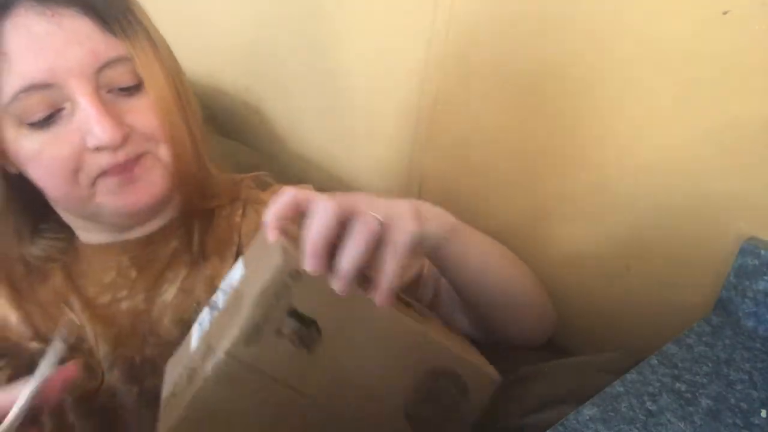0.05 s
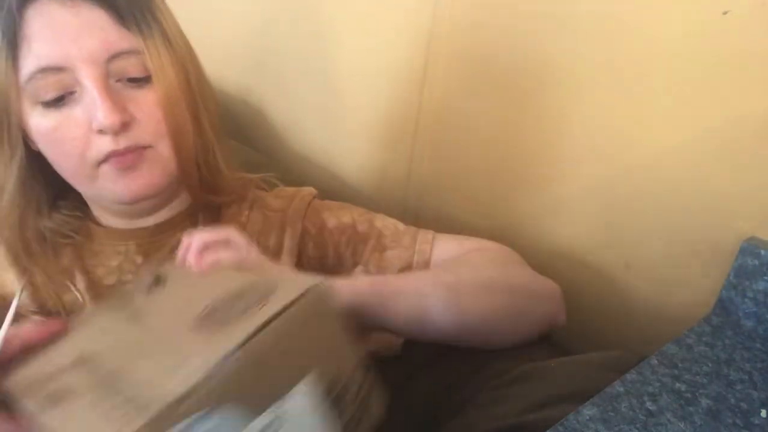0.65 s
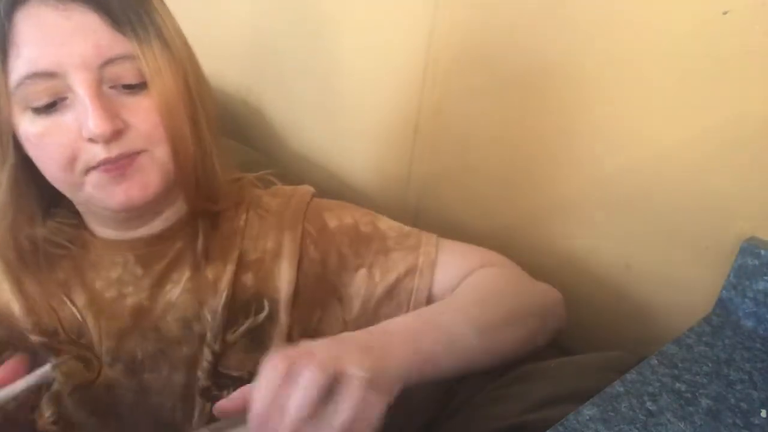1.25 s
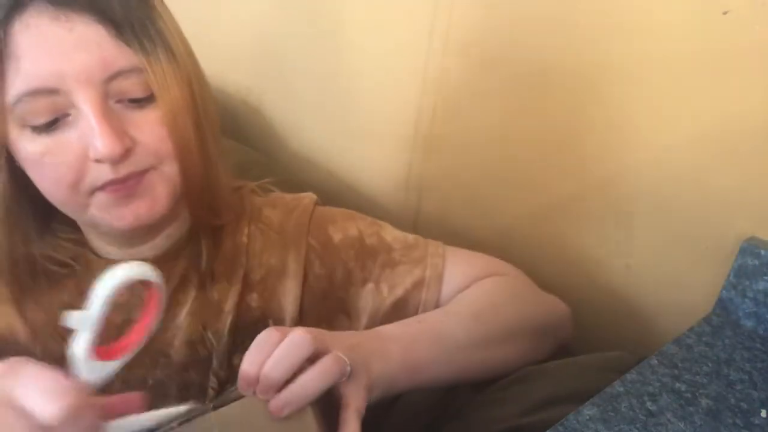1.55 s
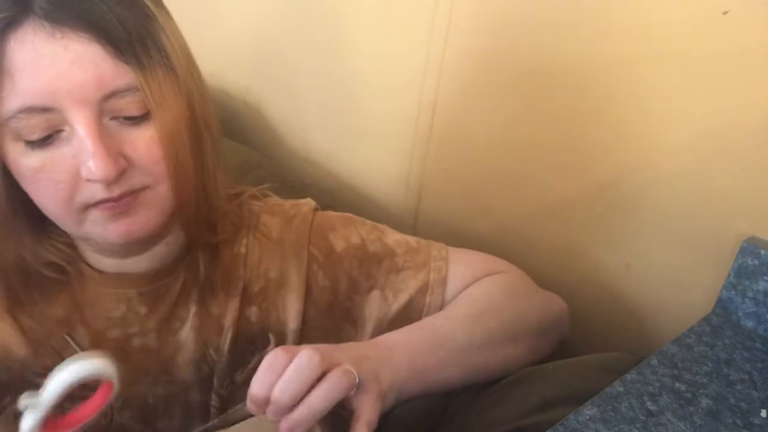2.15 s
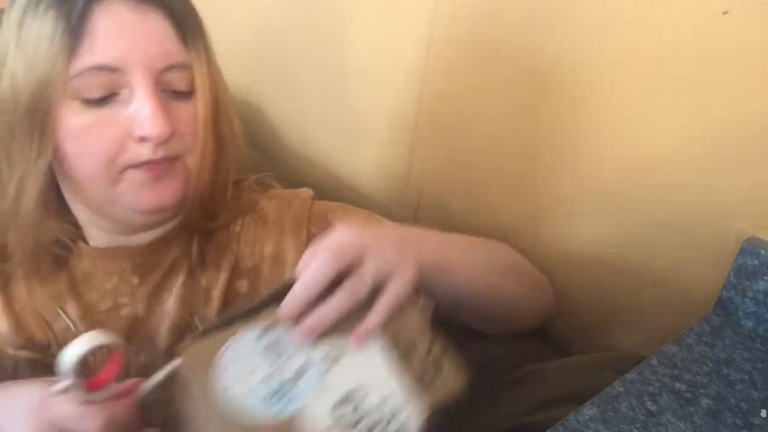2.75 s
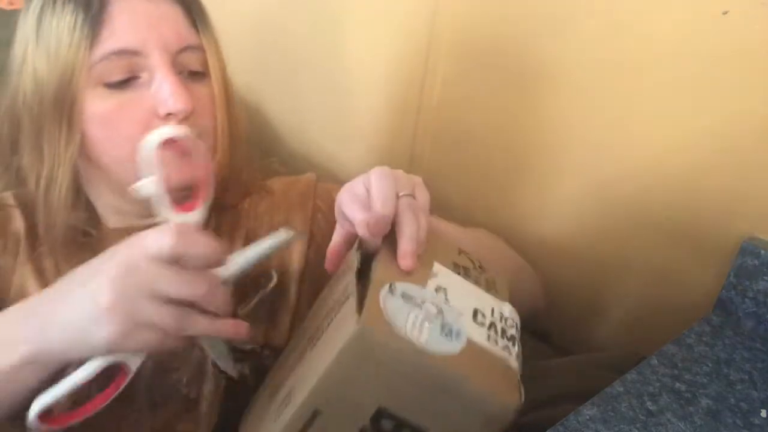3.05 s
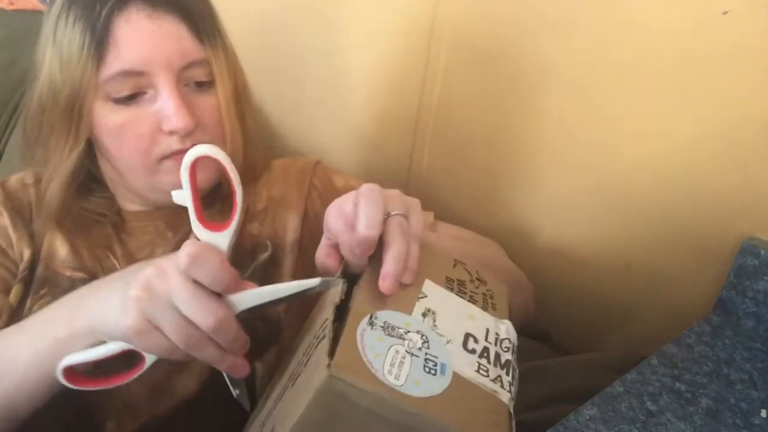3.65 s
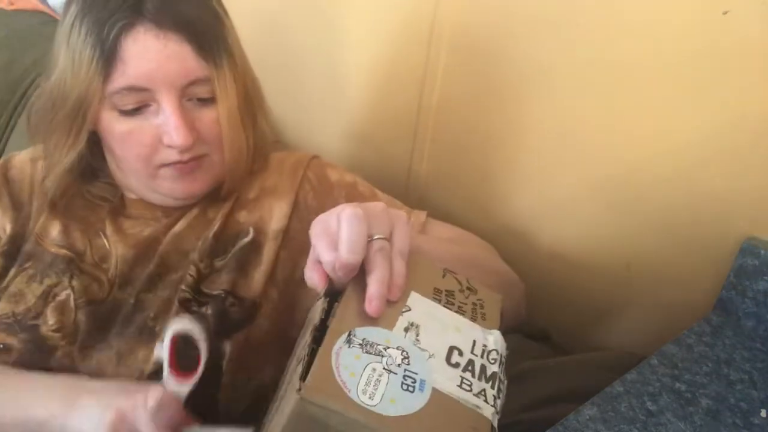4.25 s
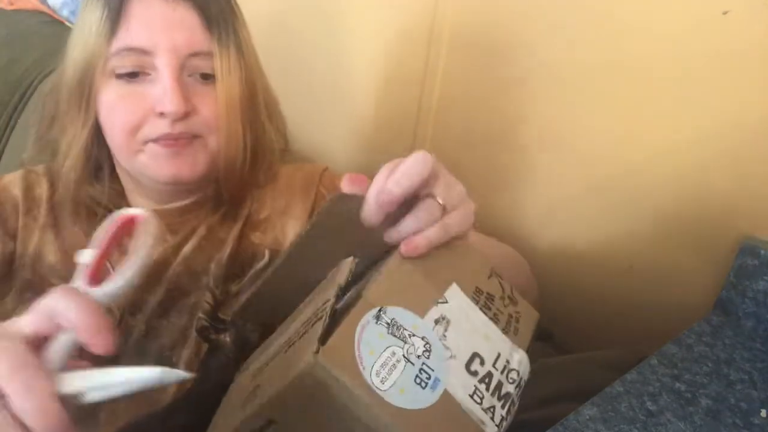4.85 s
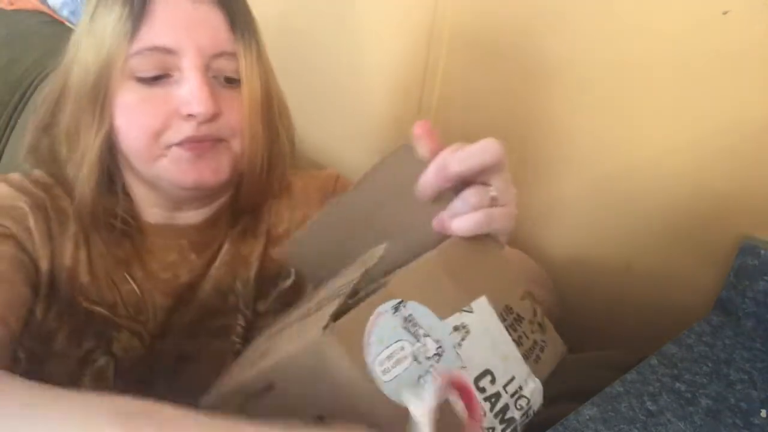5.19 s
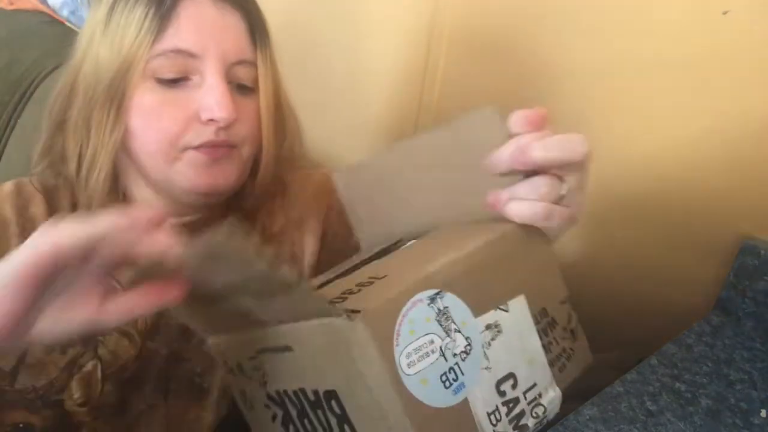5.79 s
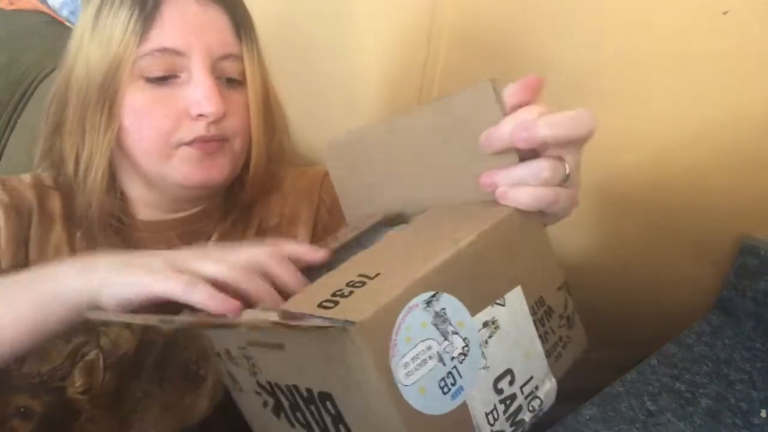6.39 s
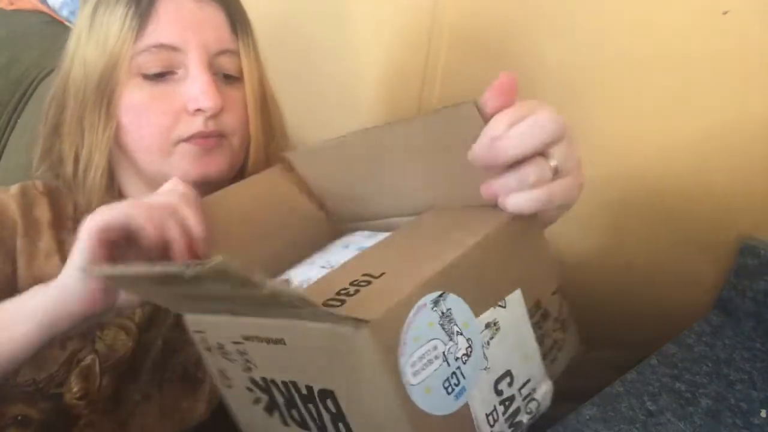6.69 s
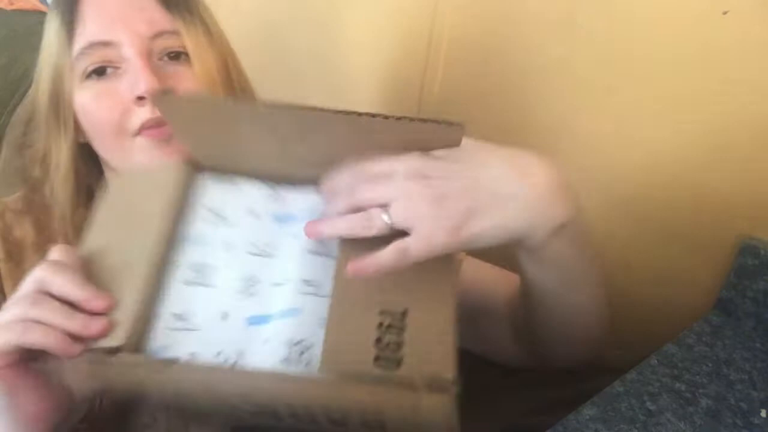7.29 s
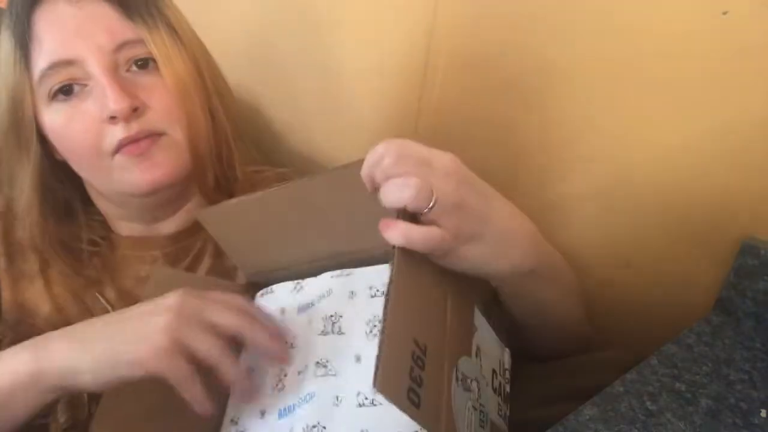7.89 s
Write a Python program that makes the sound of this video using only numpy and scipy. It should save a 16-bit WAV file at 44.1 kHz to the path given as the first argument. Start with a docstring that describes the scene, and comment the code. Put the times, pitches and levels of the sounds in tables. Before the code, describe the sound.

Close handling of a cardboard parcel: hands rub, a blade rasps along tape, the tape snaps and the flaps knock open.

```python
"""A cardboard parcel opened on a lap in a small furnished room, close to the microphone.
First hands slide over the board and turn the parcel, while a low motor-like drone gathers far off.
A scissor blade sticks and slips along the packing tape, busiest around 4 s; the tape snaps, and
each contact rings the hollow box. At 5.3 s the flaps part and its lowest resonances fade.
Hands work on over the open box, with a hard knock near 7 s, as the drone sinks."""
import sys
import numpy as np
from scipy import signal
from scipy.fft import rfft, irfft
from scipy.io import wavfile

SR = 44100
rng = np.random.default_rng(int(sys.argv[2]) if len(sys.argv) > 2 else 0)


def to_wav(s):
    """Save 16-bit WAV."""
    ch = np.atleast_2d(s).T  # columns
    pcm = np.round(np.clip(ch, -1, 1) * 32767)  # PCM
    wavfile.write(sys.argv[1], SR, pcm.astype(np.int16))


N = 349799


def scrapes(rise_s=.003, fall_s=.0031, chatter_db=.5, stiffness_db=-2, flex_below_hz=560, pivot_hz=1400):
    """Each slip of blade, tape or board is a short avalanche of fractures; a hard push flexes the wall."""
    # Each row: start in seconds, length in seconds, level in dB, wall flex in dB,
    # treble slope in dB per octave.
    slips = [(0.387, 0.026, -36.5, 1, -5), (0.478, 0.012, -34.5, -7, -13.5), (0.511, 0.014, -34, -1.5, -11),
             (0.568, 0.017, -32, -24, -13), (0.892, 0.01, -30, 1, -3.5), (0.966, 0.045, -40, 15.5, -2.5),
             (1.03, 0.029, -35.5, 15, -9), (1.096, 0.0071, -34, -8, -7.5), (1.159, 0.014, -44, -8, -1),
             (1.732, 0.015, -42.5, 10, -5), (1.849, 0.013, -39.5, 11, -3.5),
             (1.922, 0.016, -23.5, 13.5, -0.5), (1.946, 0.0096, -25, 7.5, -3.5),
             (2.172, 0.021, -28.5, 18, -0.5), (2.198, 0.014, -24.5, 7, -13), (2.217, 0.0076, -23, 20, 0.5),
             (2.234, 0.04, -33.5, 9, -2), (2.45, 0.0069, -30.5, 16, -4), (3.432, 0.012, -46.5, 7, -10),
             (3.462, 0.013, -46, -3, -6), (3.569, 0.013, -46, 1, -9), (3.888, 0.063, -34.5, 16.5, -1.5),
             (3.94, 0.0087, -19.5, 8, -5.5), (3.956, 0.025, -27.5, 15, -3.5),
             (3.99, 0.0082, -24, 2.5, -7.5), (4.063, 0.011, -26, 9.5, -6), (4.087, 0.013, -23.5, 1, -7.5),
             (4.108, 0.029, -25.5, 6, -6), (4.148, 0.012, -25, 7, -7.5), (4.173, 0.012, -23, 9, -8),
             (4.197, 0.01, -21, 6, -7.5), (4.221, 0.0097, -23, 9, -7), (4.244, 0.012, -18, 6, -9),
             (4.254, 0.011, -16, -3, -10), (4.264, 0.014, -28, 5, -8), (4.295, 0.041, -25, 10.5, -8),
             (4.341, 0.043, -26, 6, -7), (4.386, 0.009, -19.5, 7, -9.5), (4.524, 0.021, -33.5, 7, -4.5),
             (4.598, 0.029, -41, 8, -2.3), (5.307, 0.027, -30.5, -1, 0.5), (5.329, 0.011, -18.5, 1, -3),
             (5.343, 0.012, -27, 18, -3), (5.369, 0.033, -30.5, 12, -2.5), (5.411, 0.012, -26, 1, -5),
             (5.448, 0.0066, -29, 9, -8.5), (5.496, 0.011, -34, 8, -8.5), (6.093, 0.0093, -35, 7.5, -6.5),
             (6.344, 0.011, -33.5, 18, -2), (6.393, 0.026, -35.5, 5.5, -4.5),
             (6.459, 0.044, -39.5, 6.5, -6.5), (6.553, 0.016, -32, -6, -1.5), (7.062, 0.01, -29, 2, -8),
             (7.319, 0.027, -37.5, 0, -13), (7.359, 0.0055, -36, -15, -3), (7.92, 0.0082, -27, -1.5, -6.5)]
    # Spectrum of the contact. Each row: frequency in Hz, gain in dB.
    contact_colour = [(35, -41), (80, -8.5), (150, -0.5), (230, -1.5), (500, -1.5), (1400, -0.5),
                      (2500, -3), (4000, 3), (4900, -3.5), (7000, 0), (10400, -1), (13000, 1.5),
                      (16000, -8)]
    out = np.zeros(N)
    for start, length, db, flex_db, slope_db in slips:
        t = np.arange(int((length + .04) * SR)) / SR
        grip = np.minimum(t / rise_s, 1) * np.exp(-np.maximum(t - length, 0) / fall_s)
        force = grip * fibres(len(t), rate=7000, spread_db=1.5) * amp(chatter_db * walk(326, len(t)))
        flex = (flex_db + stiffness_db) / (1 + (bins() / flex_below_hz) ** 4)
        treble = slope_db * np.log2(np.maximum(bins() / pivot_hz, 1))
        colour = spectrum(contact_colour) + flex + treble + contact_spot(ripple_db=3)
        burst = signal.fftconvolve(force, response(colour))
        add(out, start - rise_s / 2, burst / np.linalg.norm(burst) * np.sqrt(length * SR) * amp(db))
    return out


def snaps(level_db=21, splinter=.21, splinter_s=.0028, skirt_db=19):
    """Tape or a crease cracks, or the blade ticks: one sharp release, then milliseconds of splintering."""
    # Each row: start in seconds, relative level in dB, centre in Hz, width in octaves.
    fractures = [(0.54, -26.5, 1720, 0.17), (0.555, -28.5, 1970, 0.17), (0.5808, -33, 1630, 0.18),
                 (0.9024, -21.5, 1440, 0.16), (0.965, -36, 1500, 0.2), (1.1333, -32, 1550, 0.24),
                 (1.7004, -41.5, 1650, 2), (1.731, -39, 1610, 2.2), (1.9219, -14.5, 3320, 0.79),
                 (2.2046, -20.5, 3000, 2), (2.3978, -31.5, 5500, 1.5), (2.7654, -34.5, 1964, 0.7),
                 (2.863, -37, 1800, 0.19), (2.902, -33.5, 1780, 0.17), (2.9163, -28, 1770, 0.14),
                 (3.063, -35, 1990, 0.58), (3.0935, -35.5, 2120, 0.7), (3.1168, -32, 1780, 0.37),
                 (3.177, -40, 2840, 0.85), (3.3224, -44, 1155, 1.1), (3.7012, -33, 5040, 1.5),
                 (3.8194, -28.5, 2400, 4.3), (4.1169, -15, 2040, 2), (4.412, -31.5, 3940, 0.28),
                 (4.6048, -30.5, 3250, 0.74), (5.3644, -11, 3100, 0.56), (5.3922, -15.5, 11000, 0.94),
                 (5.4182, -20.5, 2110, 0.29), (5.472, -32.5, 2410, 2.7), (5.532, -34.5, 8500, 0.97),
                 (5.9663, -41.5, 2570, 0.79), (6.0084, -37, 3460, 0.94), (6.205, -38.5, 2830, 0.56),
                 (6.7578, -34.5, 1220, 0.41), (6.7862, -31, 4130, 1.6), (6.839, -27.5, 3230, 0.44),
                 (7.045, -30.5, 3000, 0.61), (7.321, -32.5, 3000, 0.37), (7.336, -35, 3480, 0.43),
                 (7.361, -33, 2200, 0.22), (7.459, -28, 3260, 0.33)]
    out = np.zeros(N)
    t = np.arange(1024) / SR
    for start, db, hz, octaves in fractures:
        force = splinter * rng.standard_normal(len(t)) * np.exp(-t / splinter_s)
        force[0] += 1  # the release
        off_centre = np.log2(bins() / hz) / max(octaves, .2)
        colour = -skirt_db * np.log10(1 + off_centre ** 2 / 2) + contact_spot(ripple_db=3)
        crack = signal.fftconvolve(force, response(colour))
        add(out, start + .0003, crack / np.linalg.norm(crack) * amp(db + level_db))
    return out


def knocks(travel=.0602, rebound=.22, tilt=.55):
    """A blow sends bending waves across the wall, highs ahead of lows; they return once from the edge."""
    # Each row: start in seconds, peak in dB, lower and upper band edge in Hz.
    blows = [(0.915, -22.5, 260, 1000), (0.985, -28.5, 160, 750), (1.059, -32, 147, 483),
             (1.228, -30.5, 169, 520), (1.701, -23, 185, 730), (1.923, -17, 190, 1350),
             (1.932, -19, 160, 780), (2.18, -20.5, 170, 800), (2.221, -18, 145, 1000),
             (2.458, -31, 280, 1000), (3.321, -36, 160, 1100), (3.944, -16, 125, 1300),
             (4.389, -10.5, 190, 1500), (5.317, -15.5, 260, 1300), (5.333, -7, 202, 1530),
             (5.375, -21, 220, 500), (5.822, -24, 205, 1150), (6.348, -24, 218, 1500),
             (6.46, -23.5, 220, 1300), (7.0444, -2, 297, 1370), (7.388, -25.5, 250, 1150),
             (7.921, -19.5, 120, 330)]
    out = np.zeros(N)
    hz = bins(size=8192)
    crossing = np.exp(-4j * np.pi * travel * np.sqrt(hz))  # delay falls with the root of frequency
    for start, db, low_hz, high_hz in blows:
        push = hz ** -tilt / np.sqrt((1 + (low_hz / hz) ** 10) * (1 + (hz / high_hz) ** 10))
        wave = irfft(push * (crossing + rebound * crossing ** 3))
        add(out, start - .001, wave / np.abs(wave).max() * amp(db))
    return out


def drags(level_db=-1, stutter_db=2.5, relative_width=.2):
    """A dragged edge catches fibres that feed one resonance, gliding as the edge's free length changes."""
    # Each row: start in seconds, length in seconds, first and last pitch in Hz, relative level in dB.
    glides = [(0.597, 0.11, 3450, 3600, -47), (2.046, 0.29, 1320, 1280, -43),
              (2.15, 0.094, 5630, 6000, -37), (3.041, 0.029, 1710, 1920, -48),
              (4.24, 0.12, 4000, 4100, -34.5), (4.285, 0.13, 1840, 1400, -31),
              (5.377, 0.122, 540, 540, -34.5), (5.429, 0.18, 556, 545, -47.5),
              (6.241, 0.19, 2270, 1750, -50), (6.344, 0.064, 1500, 1200, -40)]
    out = np.zeros(N)
    for start, length, first_hz, last_hz, db in glides:
        size = int(length * SR)
        carrier = np.exp(2j * np.pi * np.cumsum(np.geomspace(first_hz, last_hz, size)) / SR)
        force = fibres(size, rate=2800, spread_db=5) * amp(stutter_db * walk(154, size))
        lowpass = signal.butter(2, relative_width * first_hz / 2, fs=SR)
        rasp = np.real(carrier * signal.lfilter(*lowpass, force / carrier))  # a band around the glide
        add(out, start, unit(rasp) * signal.windows.tukey(size, .5) * amp(db + level_db))
    return out


def strokes(attack_s=.039, release_s=.041, arch_db=2.5, resting_rub_db=-66, resting_hiss_db=-69.5):
    """Envelopes of rub and hiss: strokes are fastest midway, and even resting hands shift a little."""
    # Hands, sleeves and flaps passing over the board.
    # Each row: start in seconds, length in seconds, relative levels of rub and of hiss in dB.
    passes = [(0.0, 0.12, -51, -49.5), (0.166, 0.12, -51, -49), (0.325, 0.13, -47, -50),
              (0.45, 0.2, -42.5, -49), (0.726, 0.052, -50, -49), (0.796, 0.12, -45.5, -42),
              (0.911, 0.26, -46, -49.5), (1.234, 0.13, -57.5, -47.5), (1.387, 0.07, -54.5, -51),
              (1.807, 0.04, -55, -53), (1.918, 0.045, -40, -44), (2.035, 0.17, -45, -40),
              (2.171, 0.1, -36, -41), (2.382, 0.088, -41.5, -43.5), (2.508, 0.11, -45, -51),
              (2.666, 0.069, -41, -43.5), (2.819, 0.16, -44.5, -49), (3.01, 0.14, -54.5, -55.5),
              (3.369, 0.13, -53, -60.5), (3.547, 0.21, -56, -54), (3.803, 0.25, -43.5, -49.5),
              (4.056, 0.41, -40.5, -48), (4.576, 0.21, -55.5, -59), (4.856, 0.18, -57, -57.5),
              (5.017, 0.065, -57, -50.5), (5.318, 0.16, -40.5, -47), (5.58, 0.27, -58, -55.5),
              (5.702, 0.084, -49, -48), (5.802, 0.12, -64, -50.5), (5.975, 0.22, -56.5, -53),
              (6.235, 0.28, -51, -44.5), (6.539, 0.21, -48, -44), (6.735, 0.19, -50, -48.5),
              (6.92, 0.13, -45.5, -44.5), (7.1, 0.4, -52.5, -51.5), (7.319, 0.17, -44, -43),
              (7.49, 0.18, -45, -42), (7.662, 0.1, -43.5, -40), (7.807, 0.082, -58, -55)]
    power = np.outer(amp([resting_rub_db, resting_hiss_db]) ** 2, np.ones(N))
    for start, length, rub_db, hiss_db in passes:
        t = np.arange(int((length + .2) * SR)) / SR
        arch = amp(arch_db * (np.sin(np.pi * np.minimum(t / length, 1)) - 1))
        speed = np.minimum(t / attack_s, 1) * arch * np.exp(-np.maximum(t - length, 0) / release_s)
        add(power[0], start, (speed * amp(rub_db)) ** 2)
        add(power[1], start, (speed * amp(hiss_db)) ** 2)
    return np.sqrt(power)


def sliding(rub, hiss, hiss_db=.5, rub_judder_db=2, hiss_judder_db=2.5):
    """Skin and cloth on board: a grainy rub under a finer hiss, juddering together."""
    # Spectra of the rub and the hiss. Each row: frequency in Hz, gain in dB.
    rub_colour = [(60, -29), (160, 1), (350, -1.5), (650, 0), (1400, 0), (2500, -7), (4000, -6.5),
                  (9000, -52)]
    hiss_colour = [(700, -9), (2000, 1), (3300, 3), (4800, 0.5), (6500, 0), (9000, 0.5), (10400, -3),
                   (12500, 1), (16000, -8.5)]
    judder = walk(70, N)
    board = moving_contact(fibres(N, rate=3000, spread_db=2.5), rub_colour, ripple_db=3)
    surface = moving_contact(fibres(N, rate=22000, spread_db=-2.5), hiss_colour, ripple_db=1.5)
    rubbing = board * rub * amp(rub_judder_db * judder)
    return rubbing + surface * hiss * amp(hiss_db + hiss_judder_db * judder)


def crinkles(rub, level_db=-9):
    """Nails and loose tape tick faintly while the hands move."""
    # Spectrum of a tick. Each row: frequency in Hz, gain in dB.
    tick_colour = [(200, -17), (900, 0.5), (1800, -7.5), (3800, -5.5), (8000, -13), (16000, -12)]
    ticks = fibres(N, rate=55, spread_db=2)
    return moving_contact(ticks, tick_colour, ripple_db=3.5) * rub * amp(level_db)


def fibres(size, rate, spread_db):
    """Paper fibres catch and let go: clicks of unequal strength, about `rate` a second."""
    caught = rng.random(size) < rate / SR
    clicks = caught * rng.standard_normal(size)
    return unit(clicks * amp(spread_db * np.minimum(rng.exponential(size=size), 4)))


def contact_spot(ripple_db, spacing_hz=220):
    """Each place of contact favours some of the wall's many modes over others: dB per bin."""
    mode_axis = np.log1p(bins() / (10 * spacing_hz)) * 10
    knots = int(mode_axis[-1]) + 2
    return ripple_db * np.interp(mode_axis, np.arange(knots), rng.standard_normal(knots))


def moving_contact(friction, colour, ripple_db, size=8192):
    """Colour a friction sound whose place of contact keeps moving."""
    out, window = np.zeros(N), np.hanning(size)
    for i in range(0, N, size // 2):
        piece = friction[i:i + size] * window[:N - i]
        add(out, i / SR, signal.fftconvolve(piece, response(spectrum(colour) + contact_spot(ripple_db))))
    return out


def box(contacts, open_s=5.3, parting_s=.05, level_db=-1.5):
    """Contacts are heard directly and through the box's resonances, whose lowest fade once it is open."""
    # Resonances of walls and cavity. Each row: centre in Hz, width in Hz,
    # relative gain in dB with the flaps shut, then with them open.
    modes = [(173, 67, -4, -33), (203.5, 26, 1.5, -28), (237, 24, -11.5, -14), (334.7, 6.1, -1.5, 1.5),
             (433, 11, -10, -5), (555, 20, -3, -28), (747, 25, -12.5, -5), (945, 26, -7, -9),
             (1140, 21, -8, -29), (1326, 39, -5, -0.5), (1490, 69, -10, -6.5), (1660, 58, -11.5, -5),
             (2215, 42, -9, -4), (2680, 210, -41, -9), (3320, 26, -4, -1), (3680, 72, -25, -7),
             (5810, 800, -5.5, -10), (6690, 230, -7, -6)]
    opened = np.clip((np.arange(N) / SR - open_s) / parting_s, 0, 1)
    ringing = np.zeros(N)
    for hz, width_hz, shut_db, open_db in modes:
        mode = signal.lfilter(*signal.iirpeak(hz, hz / width_hz, fs=SR), contacts)
        ringing += mode * ((1 - opened) * amp(shut_db) + opened * amp(open_db))
    return amp(level_db) * (contacts + ringing)


def jolts(sway_hz=50, wall_hz=115, decay_s=.016):
    """As the blade gives way the box sways on the lap and its wall heaves, both for a cycle or two."""
    # Each row: start in seconds, peak in dB.
    lurches = [(3.944, -25), (3.984, -29), (4.104, -24), (4.171, -33), (4.23, -34), (4.379, -23)]
    out = np.zeros(N)
    t = np.arange(SR // 5) / SR
    thud = (np.sin(2 * np.pi * sway_hz * t) + np.sin(2 * np.pi * wall_hz * t)) * np.exp(-t / decay_s)
    for start, db in lurches:
        add(out, start, thud / np.abs(thud).max() * amp(db))
    return out


def room(direct, t60_s=.35, wet_db=-19, damp_hz=4500, gap_s=.0027):
    """The close microphone hears only a faint, short tail, dulled by sofa and curtains."""
    t = np.arange(SR // 2) / SR
    tail = rng.standard_normal(len(t)) * amp(-60 * t / t60_s) * (t > gap_s)
    tail = signal.lfilter(*signal.butter(1, damp_hz, fs=SR), tail / np.linalg.norm(tail))
    return direct + amp(wet_db) * through(direct, tail)


def drone(full_s=.95, slows_s=6.65, rise_per_s=.36, sink_per_s=.41, db_per_octave=26, waver_db=.5):
    """Low tones, as of a distant motor that gathers speed, holds and sinks; the upper pair throbs."""
    # Each row: pitch at full speed in Hz, level midway through the hold in dB, drift in dB per second.
    partials = [(60.7, -49.5, -1.03), (99.2, -52.5, 1.47), (110.6, -64, 2.2)]
    t = np.arange(N) / SR
    slack = rise_per_s * np.maximum(full_s - t, 0) + sink_per_s * np.maximum(t - slows_s, 0)
    speed = np.maximum(1 - slack, .1) * (1 + .01164 * walk(4, N))  # share of full speed, a bit unsteady
    running_s = np.cumsum(speed) / SR
    from_middle_s = t - (full_s + slows_s) / 2
    tones = np.zeros(N)
    for hz, db, drift in partials:
        gain = amp(db + drift * from_middle_s + waver_db * walk(4.7, N))
        tones += gain * np.sin(2 * np.pi * hz * running_s)
    return np.sqrt(2) * tones * amp(db_per_octave * np.log2(speed))  # louder with speed


def room_tone(level_db=-51):
    """The still air of the room: a steady noise, mostly bass."""
    # Each row: frequency in Hz, gain in dB.
    air_colour = [(25, -7), (45, -8.5), (85, 0.5), (140, -8.5), (250, -12.5), (600, -20.5), (1300, -20),
                  (3000, -29.5), (8000, -38.5), (16000, -71)]
    return amp(level_db) * through(rng.standard_normal(N), response(spectrum(air_colour)))


def amp(db):
    """Decibels to gain."""
    return 10 ** (np.asarray(db) / 20)


def unit(x):
    """Scale to an rms of one."""
    return x / np.sqrt(np.mean(x ** 2) + 1e-18)


def add(out, start_s, x):
    """Mix x into out from start_s on."""
    i = int(np.clip(np.round(start_s * SR), 0, N - 1))
    out[i:i + len(x)] += x[:N - i]


def walk(rate, size):
    """A random curve with a spread near one, turning `rate` times a second."""
    steps = np.arange(size) * rate / SR
    knots = int(steps[-1]) + 2
    return np.interp(steps, np.arange(knots), rng.standard_normal(knots))


def bins(size=2048):
    """Frequencies in Hz at which responses are drawn."""
    return np.maximum(np.arange(size // 2 + 1) * SR / size, 1)


def spectrum(points):
    """Join (Hz, dB) points into a gain in dB per bin."""
    hz, db = np.transpose(points)
    return np.interp(np.log(bins()), np.log(hz), db)


def response(db):
    """Minimum-phase impulse response of unit energy, shaped by the given dB per bin."""
    cepstrum = irfft(np.log(amp(db) + 1e-6))
    half = len(cepstrum) // 2
    cepstrum[1:half] *= 2
    cepstrum[half + 1:] = 0
    impulse = irfft(np.exp(rfft(cepstrum)))
    return impulse / np.linalg.norm(impulse)


def through(x, impulse):
    """Filter x by an impulse response."""
    return signal.fftconvolve(x, impulse)[:len(x)]


def scene():
    """The handled box close to one microphone, over still air and the far drone."""
    rub, hiss = strokes()
    contacts = sliding(rub, hiss) + crinkles(rub) + drags() + scrapes() + snaps() + knocks()
    return (room(box(contacts)) + jolts() + room_tone() + drone())[None]


def record(dry, bass_hz=42, top_hz=16200):
    """The recorder drops the deepest bass and cuts the top."""
    lean = signal.sosfilt(signal.butter(6, bass_hz, "high", fs=SR, output="sos"), dry)
    return signal.sosfilt(signal.ellip(8, .2, 70, top_hz, fs=SR, output="sos"), lean)


dry = scene()
out = record(dry)
to_wav(out)
```